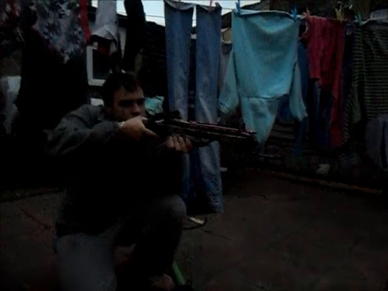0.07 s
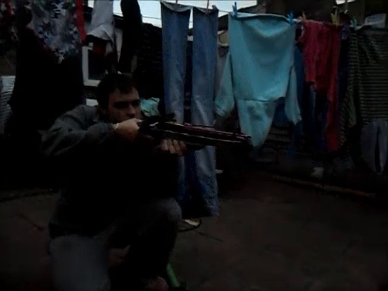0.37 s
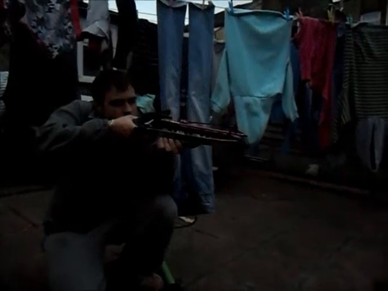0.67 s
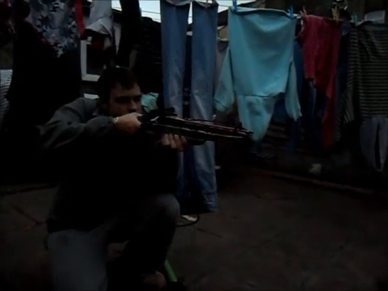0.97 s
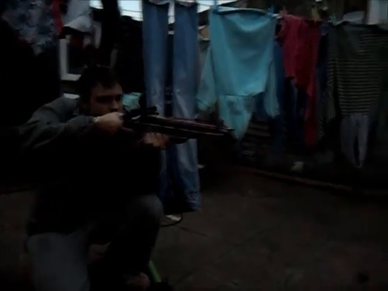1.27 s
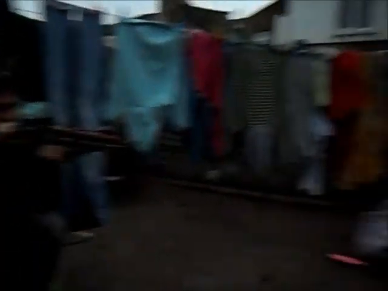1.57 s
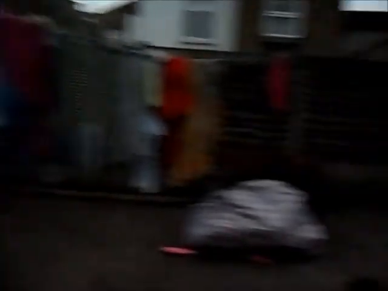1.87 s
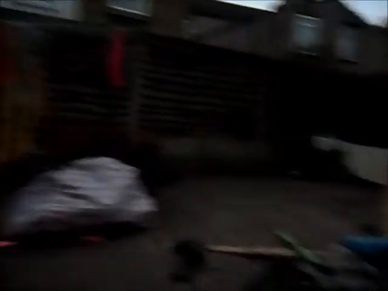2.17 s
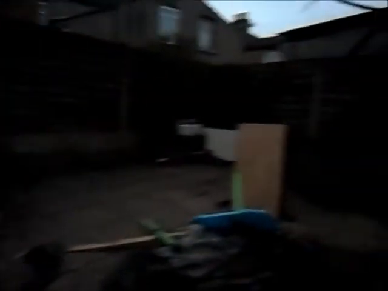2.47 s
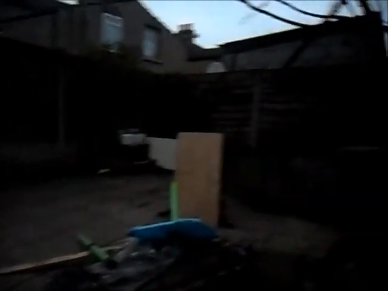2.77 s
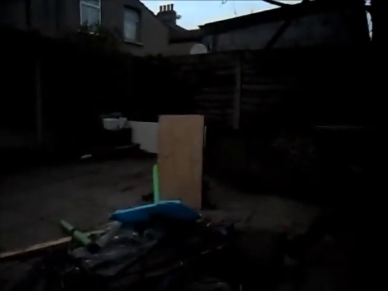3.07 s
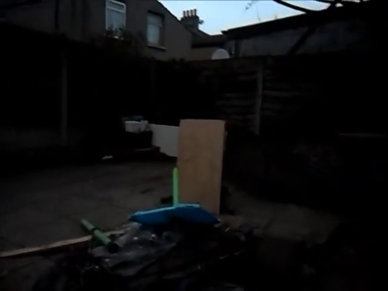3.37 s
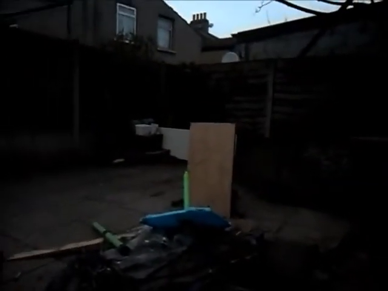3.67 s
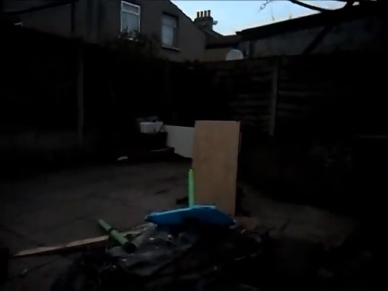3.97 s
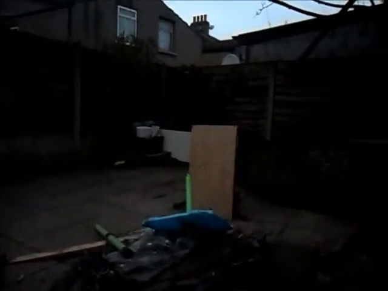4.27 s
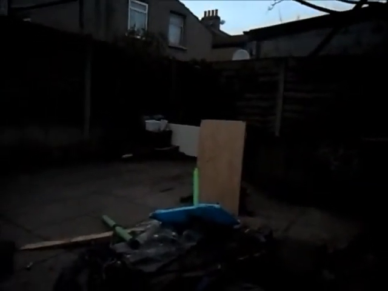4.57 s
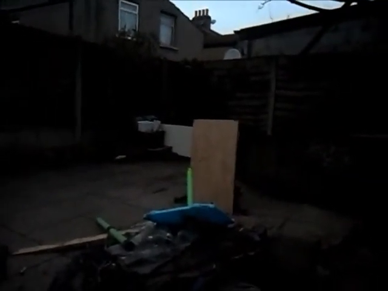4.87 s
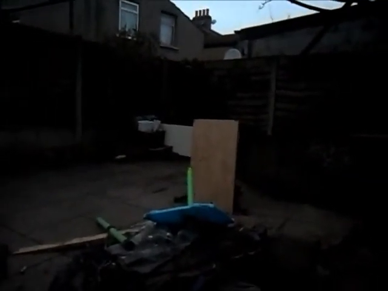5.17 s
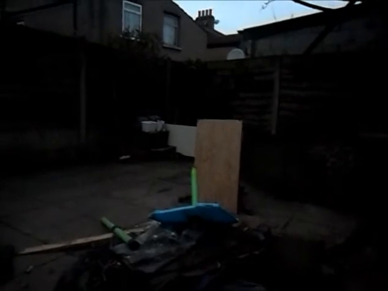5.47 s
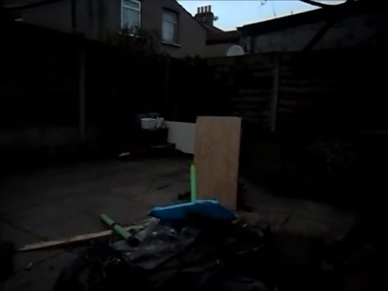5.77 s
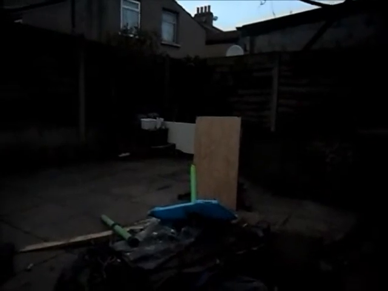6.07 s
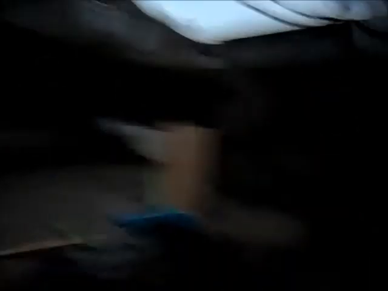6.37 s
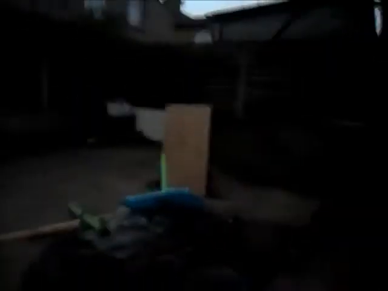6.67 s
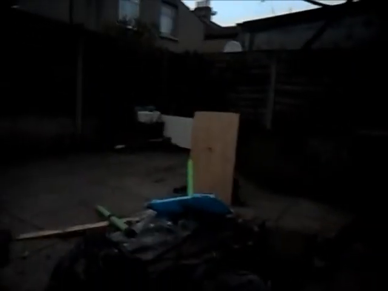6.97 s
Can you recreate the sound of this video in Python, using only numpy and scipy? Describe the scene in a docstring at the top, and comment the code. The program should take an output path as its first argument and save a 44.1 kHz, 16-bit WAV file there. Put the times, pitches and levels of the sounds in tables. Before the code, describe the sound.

In a fenced backyard, faint town air and distant drones sit under microphone hiss, with soft finger ticks and low rumble on a small handheld camera. Near the end a crossbow fires with a bright snap and brief thrum, and almost at once the bolt cracks into a wooden board. The loud shot overloads the microphone and echoes briefly, then the camera's plastic case creaks and ticks.

```python
"""A crossbow fired in a fenced backyard: the latch snaps, the limbs thrum, and 50 ms later the bolt
hits a wooden board. Fences and house walls throw the shot back over faint town air and distant drones.
The microphone is in a small handheld camera, so the handling is close: hiss, finger ticks, rumble,
and a creak of the case as the hand flinches after the shot.
The shot overloads the microphone and pushes the gain control down."""
import sys
import numpy as np
from scipy import signal
from scipy.fft import rfft, irfft, next_fast_len
from scipy.io import wavfile
from scipy.ndimage import map_coordinates

SR = 44100
rng = np.random.default_rng(int(sys.argv[2]) if len(sys.argv) > 2 else 0)


def int16_out(signal):
    """Quantize to a 16-bit WAV file."""
    q = np.round(np.clip(np.atleast_2d(signal).T, -1, 1) * 32767)
    wavfile.write(sys.argv[1], SR, q.astype(np.int16))


N = 319284

# The string's blows on its stop. Each row: start in seconds, level in dB, t60 in seconds.
STRING_BLOWS = [(6.3321, -4.5, 0.22), (6.354, -5.5, 0.14)]
# The bolt's hit, then the board's slap on its prop. Each row: start in seconds, level in dB,
# t60 in seconds.
BOARD_BLOWS = [(6.3765, 6.5, 0.049), (6.389, -0.5, 0.13)]


def amp(db):
    """Decibels to gain."""
    return 10 ** (np.asarray(db) / 20)


def unit(x):
    """x at rms 1."""
    return x / np.sqrt(np.mean(x ** 2) + 1e-20)


def clock():
    """The time of every sample, in seconds."""
    return np.arange(N) / SR


def along(points, hz):
    """Read a curve of (Hz, value) points on a log frequency axis."""
    f, v = np.transpose(points)
    return np.interp(np.log(hz + 1), np.log(f + 1), v)


def filtered(x, response):
    """x shaped by a gain that depends on frequency."""
    size = next_fast_len(len(x) + SR // 4)
    return irfft(rfft(x, size) * response(np.fft.rfftfreq(size, 1 / SR)), size)[:len(x)]


def noise(colour, size):
    """Noise of rms 1. Each row of a colour: frequency in Hz, relative level in dB."""
    return unit(filtered(rng.standard_normal(size), lambda hz: amp(along(colour, hz))))


def band(hz, width_hz):
    """A fuzzy tone: noise of rms 1 in one narrow band."""
    return unit(filtered(rng.standard_normal(N), lambda f: np.exp(-((f - hz) / width_hz) ** 2)))


def wobble(rate):
    """A smooth random curve, rate knots a second."""
    return map_coordinates(rng.standard_normal(int(N * rate / SR) + 4), [clock() * rate])


def fade(t, t60):
    """A decay of 60 dB in t60 seconds."""
    return np.exp(-np.log(1000) * t / t60)


def ping(hz, t60):
    """One small, heavily damped resonance."""
    t = clock()[:SR // 10]
    return np.sin(2 * np.pi * hz * t) * fade(t, t60)


def add(track, start, sound):
    """Mix a sound into the track at start seconds."""
    part = track[round(start * SR):][:len(sound)]
    part += sound[:len(part)]


def struck(blows, colour, attack_s):
    """Each blow sets off a dense, quickly dying clatter."""
    out, t = np.zeros(N), clock()[:SR]
    for start, db, t60 in blows:
        add(out, start, amp(db) * noise(colour, size=SR) * fade(t, t60) * (1 - np.exp(-t / attack_s)))
    return out


def rung(start, modes, scatter_db):
    """A blow rings the modes, each at a slightly uneven strength."""
    out, t = np.zeros(N), clock()[:SR]
    for k, (hz, db, t60) in enumerate(modes):
        strength = (-1) ** k * amp(db + scatter_db * rng.standard_normal())
        add(out, start, strength * np.sin(2 * np.pi * hz * t) * fade(t, t60))
    return out


def background():
    """Town air and two drones in the distance; microphone hiss and the camera's thin whine up close."""
    # Air and hiss. Each row: frequency in Hz, relative level in dB.
    air_colour = [(25, 3), (100, -6.5), (190, -7.5), (330, -4), (450, -9.5), (680, -8), (900, -9),
                  (1400, -14), (2600, -17), (6500, -20.5), (9800, -21.5), (10500, -26)]
    # The drones' drift. Each row: time in seconds, low drone in dB, high drone in dB.
    drone_levels = [(0, -66, -65), (1.3, -74, -63), (2.3, -73, -63.5), (3.2, -66.5, -66.5),
                    (4.5, -64, -66.5), (6.2, -66.5, -65)]
    times, low_db, high_db = np.transpose(drone_levels)
    low = amp(np.interp(clock(), times, low_db)) * band(hz=359.3, width_hz=50)
    high = amp(np.interp(clock(), times, high_db)) * band(hz=558.5, width_hz=57)
    air = amp(-54.5) * noise(air_colour, size=N)
    whine = amp(-77.5) * band(hz=7860, width_hz=50)
    return air + low + high + whine


def buffet():
    """Jolts of the hand push air over the microphone: swells of rumble, the stronger ones fluttering."""
    # The hand's jolts. Each row: peak time in seconds, half length in seconds, level in dB.
    jolts = [(1.781, 0.029, -40.5), (1.909, 0.017, -44.5), (2.3, 0.033, -41), (2.377, 0.025, -34),
             (2.481, .04, -37.5), (2.64, 0.067, -44), (2.884, 0.05, -44), (3.724, 0.065, -47),
             (4.355, 0.019, -49), (4.84, 0.04, -49), (5.22, 0.063, -44), (5.433, .06, -50),
             (5.703, .04, -48), (5.877, 0.035, -46), (6.547, 0.082, -37.5), (7.1, 0.18, -47)]
    # Air on the microphone, deep and higher up. Each row: frequency in Hz, relative level in dB.
    rumble_colour = [(8, -10.5), (20, 3.5), (38, -2), (70, -4.5), (110, -12.5), (190, -34.5), (500, -53)]
    flutter_colour = [(40, -20.5), (80, -5), (110, 2.5), (170, -6), (260, -12), (450, -33.5), (1500, -58.5)]
    steady_rumble_db, steady_flutter_db, full_flutter_at_db = -57.5, -66.5, -35.5
    t = clock()
    swell_power = sum((amp(db) * np.exp(-((t - peak) / half) ** 2 / 2)) ** 2 for peak, half, db in jolts)
    rumble = np.sqrt(amp(steady_rumble_db) ** 2 + swell_power)
    flutter_share = np.minimum(rumble / amp(full_flutter_at_db), 1)
    flutter = amp(steady_flutter_db) + amp(-3) * rumble * flutter_share
    lumps = unit(amp(4 * wobble(rate=28)))
    return rumble * noise(rumble_colour, size=N) + flutter * lumps * noise(flutter_colour, size=N)


def finger_ticks(ring_hz, ring_t60, rebound_s, rebound_db, thud_db):
    """A finger shifts on the camera: a short push, a ring and thud of the case, a weaker rebound."""
    # Soft ticks of the case. Each row: start in seconds, level in dB, rise of the push in seconds.
    ticks = [(.2898, -32, 0.00018), (.321, -32, 0.0003), (2.335, -31.5, 0.00014), (2.364, -31, .00022),
             (2.396, -26.5, 0.00024), (2.776, -34.5, .0002), (3.022, -34, 0.00017), (3.0836, -30, .00034),
             (3.5513, -32, 0.00017), (4.018, -33, 0.00038), (4.334, -34, .00022), (4.5058, -33, .00027),
             (4.632, -32.5, 0.00016), (5.429, -34, 0.00019), (5.584, -32.5, 0.00014),
             (6.5813, -11.5, 0.00024), (6.727, -19, 0.00036), (6.7612, -16, 0.0002), (6.881, -31.5, .00035)]
    out, t = np.zeros(N), clock()[:SR // 10]
    # Four fainter ticks fall at random as the hand settles.
    faint = [(rng.uniform(2.7, 2.8), rng.normal(-41, 4.5), 0.00019) for _ in range(4)]
    rows = [*ticks, *faint]
    for (start, db, rise), (detune, lag) in zip(rows, rng.standard_normal((len(rows), 2))):
        push = (t / rise * np.exp(1 - t / rise)) ** 2
        ring = .3 * ping(ring_hz * np.exp(0.082 * detune), ring_t60)
        thud = amp(thud_db) * ping(hz=189, t60=0.024)
        add(out, start, -amp(db) * (0.79 * push + ring - thud))
        add(out, start + rebound_s * np.exp(0.145 * lag), -amp(db + rebound_db) * push)
    return out


def part_clicks():
    """Small hard parts by the microphone ring over a dry crack; harder clicks are brighter."""
    # Clicks, some in quick rattles. Each row: start in seconds, level in dB, ring in Hz.
    clicks = [(.183, -17.5, 4900), (.221, -26.5, 3950), (.2238, -38, 2680), (2.939, -38.5, 2570),
              (4.307, -31, 3000), (4.3064, -34, 2080), (4.307, -33, 926), (6.759, -23.5, 3120)]
    # A part's modes. Each row: multiple of its ring, relative level in dB, cycles to die by 60 dB.
    modes = [(1.001, 1, 16.5), (1.3, -5, 14), (1.75, -8, 14)]
    brighten_above_db = -28.5
    out, t = np.zeros(N), clock()[:SR // 10]
    for start, db, hz in clicks:
        tilt = max(db - brighten_above_db, 0)  # dB per octave
        ring = 0
        for k, (multiple, mode_db, cycles) in enumerate(modes):
            strength = (-1) ** k * amp(mode_db + tilt * np.log2(multiple))
            ring += strength * ping(hz * multiple, t60=cycles / (hz * multiple))
        crack = amp(-15.5) * rng.standard_normal(len(t)) * fade(t, 0.025)
        add(out, start, amp(db) * (ring + crack))
    return out


def case_creaks(slips_per_s, scatter_db, taper_db):
    """Plastic sticks and slips in the tightening grip: uneven spikes that weaken as the strain eases."""
    # Creaks, the shortest one slip. Each row: start in seconds, length in seconds, relative level in dB.
    creaks = [(6.462, .003, -17.5), (6.509, .012, -26), (6.5188, .006, -11), (6.541, .022, -19.5),
              (6.577, .014, -14.5), (6.6165, .024, -13.5), (6.645, .0005, -7), (6.7238, .005, -16.5),
              (6.761, .0005, -13), (6.883, .0005, -15.5)]
    # The tone of a slip. Each row: frequency in Hz, relative level in dB.
    slip_colour = [(100, 10), (1000, 4.5), (3000, -1), (6000, -4), (10000, -9)]
    out = np.zeros(N)
    for start, length, db in creaks:
        gaps = rng.uniform(.3, 1.7, 64) / slips_per_s
        drops_db = scatter_db * np.abs(rng.standard_normal(64))
        delays = np.cumsum(gaps) - gaps[0]
        for delay, drop_db in zip(delays[delays < length], drops_db):
            add(out, start + delay, amp([db - drop_db * (delay > 0) - taper_db * delay / length]))
    return amp(9) * filtered(out, lambda hz: amp(along(slip_colour, hz)))


def fences(x, db, t60):
    """Nearby fences and paving scatter the sharp blows."""
    t = clock()[:SR]
    echo = rng.standard_normal(SR) * (rng.random(SR) < .05) * fade(t, t60) * (t > .012)
    return x + amp(db) * signal.fftconvolve(x, echo / np.linalg.norm(echo))[:N]


def houses(x, db):
    """House walls farther off return a faint, longer and duller tail."""
    # The yard's decay. Each row: frequency in Hz, t60 in seconds.
    yard_decay = [(100, 0.93), (500, 0.55), (2000, 0.57), (5000, 0.41), (10000, .3)]
    hz, times, spectrum = signal.stft(rng.standard_normal(SR), SR, nperseg=256)
    spectrum *= fade(times, along(yard_decay, hz)[:, None])
    echo = signal.istft(spectrum, SR, nperseg=256)[1][:SR] * (clock()[:SR] > .03)
    return x + amp(db) * signal.fftconvolve(x, echo / np.linalg.norm(echo))[:N]


def bass_cut(x, corner_hz):
    """The shot reaches the microphone with little deep bass."""
    return signal.sosfilt(signal.butter(2, corner_hz, "highpass", fs=SR, output="sos"), x)


def ringing():
    """The limbs thrum once the string has stopped; the board rings once the bolt is in."""
    # Modes of limbs and board. Each row: frequency in Hz, relative level in dB, t60 in seconds.
    limb_modes = [(97, -2, 0.091), (178, -15.5, .15), (301.7, -10, 0.31), (353.4, -6, 0.36),
                  (390.4, -2, 0.23), (619, -8, 0.17), (810, -13, 0.32), (826, -13.5, 0.25),
                  (938, -12.5, .15), (1037, -15, 0.24), (1280, -14.5, 0.41), (1654, -12, 0.41),
                  (1677, -8, 0.25), (2970, -7.5, 0.045), (3868, -17.5, .18), (4100, -9.5, .06)]
    board_modes = [(170.4, -2, 0.17), (294, -15, 0.28), (371.5, -1, 0.19), (378, -15, 0.27),
                   (689, -3.5, 0.19), (744, -17.5, 0.15), (851, -7, 0.15), (908, -2, 0.22),
                   (968, -0.5, 0.15), (1119, -14.5, .09), (1330, 3, 0.12), (1372, -4, 0.076),
                   (1400, -11, .12), (1554, -12.5, .15), (1600, -17, 0.2), (1730, -17, 0.268),
                   (1805, -1.5, 0.092), (1877, -13.5, .25), (1957, -4.5, 0.087), (1920, -13, .12),
                   (2150, -10, .13), (2310, -12.5, .11), (2404, -3.5, 0.13), (2530, -9.5, .15),
                   (2495, -8, .15), (2837, -22.5, 0.19), (3054, -11, 0.081)]
    limbs = amp(-2.0) * rung(STRING_BLOWS[0][0], limb_modes, scatter_db=1.0)
    board = amp(-4.0) * rung(BOARD_BLOWS[0][0], board_modes, scatter_db=1.5)
    return limbs + board


def bolt_hit():
    """Downrange, the point cracks into the board with one hard push; the board clacks on its prop."""
    # The struck wood. Each row: frequency in Hz, relative level in dB.
    wood_colour = [(40, -28), (150, -19.5), (360, -7), (600, -11), (1000, -13), (1350, -7), (1900, -3.5),
                   (2600, -10.5), (3700, -16.5), (5500, -27), (9000, -34.5), (11000, -53.5)]
    t = clock()[:SR // 10]
    wood = amp(-1.0) * struck(BOARD_BLOWS, wood_colour, attack_s=0.00023)
    crack = amp(2.5) * rng.standard_normal(len(t)) * fade(t, 0.0066)
    push = amp(20) * ping(hz=1000, t60=.005)
    add(wood, BOARD_BLOWS[0][0], crack - push + amp(5.5) * ping(hz=2316, t60=0.01))
    clack = amp(-1.0) * ping(hz=2010, t60=0.042) + amp(0.5) * ping(hz=3600, t60=.012)
    add(wood, BOARD_BLOWS[1][0], clack)
    return wood


def crossbow():
    """The steel latch lets go with a bright snap; the string stops with a thud and a rattle."""
    # The latch's blows. Each row: start in seconds, level in dB, t60 in seconds.
    latch_blows = [(6.3272, -1, 0.05), (6.3391, -9.5, 0.11)]
    # The clatter of latch and limbs. Each row: frequency in Hz, relative level in dB.
    latch_colour = [(59, -45.5), (100, -13.5), (513, -14), (1820, -9), (3020, -5), (3740, -3), (4630, -4.5),
                    (5310, -5), (7690, -22.5), (9900, -22.5), (10500, -28), (13600, -58.5), (22000, -120)]
    limb_colour = [(35, -35), (100, -11.5), (220, -8), (350, -3.5), (520, -7.5), (850, -1.5), (1400, -10),
                   (2400, -12), (5000, -16), (8800, -24), (10500, -33), (13000, -60.5)]
    snap = struck(latch_blows, latch_colour, attack_s=0.0004)
    add(snap, latch_blows[0][0], amp(1.5) * ping(hz=3690, t60=0.015))
    stop = struck(STRING_BLOWS, limb_colour, attack_s=0.00059)
    add(stop, STRING_BLOWS[0][0], amp(0.5) * ping(hz=310, t60=0.021))
    return snap + stop


def scene():
    """The shot out in the yard, with the camera's own noises right at the microphone."""
    blows = fences(crossbow() + bolt_hit(), db=-13.5, t60=.25)
    shot = bass_cut(houses(blows + ringing(), db=-25.5), corner_hz=70)
    ticks = finger_ticks(ring_hz=1330, ring_t60=0.0077, rebound_s=0.0056, rebound_db=-12.5, thud_db=-7)
    clicks = part_clicks()
    grip = case_creaks(slips_per_s=1600, scatter_db=6, taper_db=4)
    return (shot + ticks + clicks + grip + buffet() + background())[None]


def gain_control(x, ceiling_db, range_db, attack_s):
    """A loud peak pulls the gain down within its range, and it stays down."""
    needed_gain = np.clip(amp(ceiling_db) / (np.abs(x) + 1e-9), amp(range_db), 1)
    cut = 1 - np.minimum.accumulate(needed_gain)
    pole = np.exp(-1 / (attack_s * SR))
    return x * (1 - signal.lfilter([1 - pole], [1, -pole], cut))


def record(dry):
    """The camera's input opens with a soft bump as its bias settles; gain control, overload, top cut."""
    opens_s, top_hz = .162, 10500
    since_open = clock() - opens_s
    bias = amp(-33.5) * fade(np.abs(since_open), t60=1.5)
    x = gain_control(dry[0] + bias, ceiling_db=-11.5, range_db=-13.0, attack_s=.002)
    x = np.clip(x, -.97, .97) * (since_open > 0)
    return filtered(x, lambda hz: 1 / np.sqrt(1 + (hz / top_hz) ** 100))[None]


dry = scene()
out = record(dry)
int16_out(out)
```